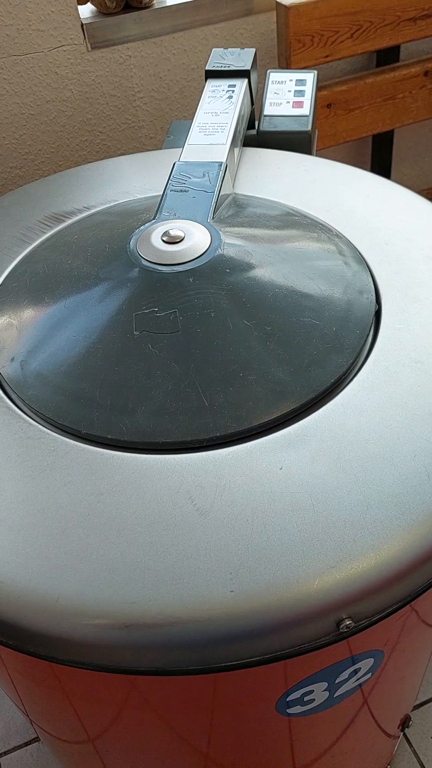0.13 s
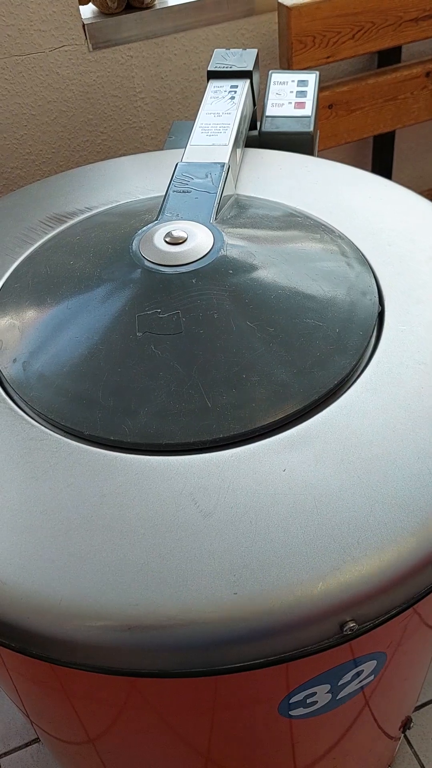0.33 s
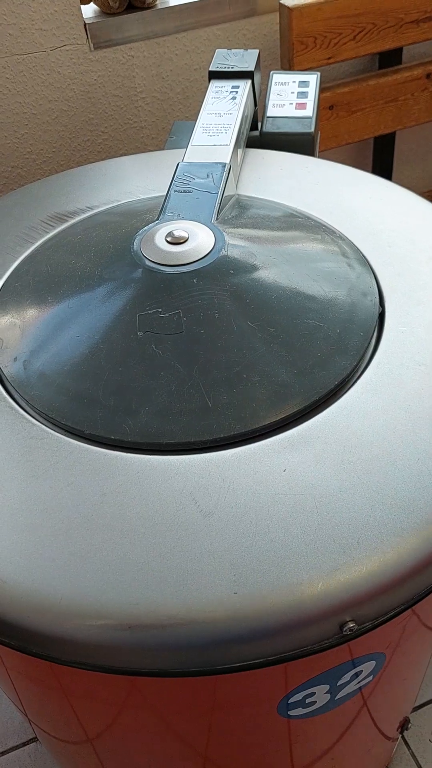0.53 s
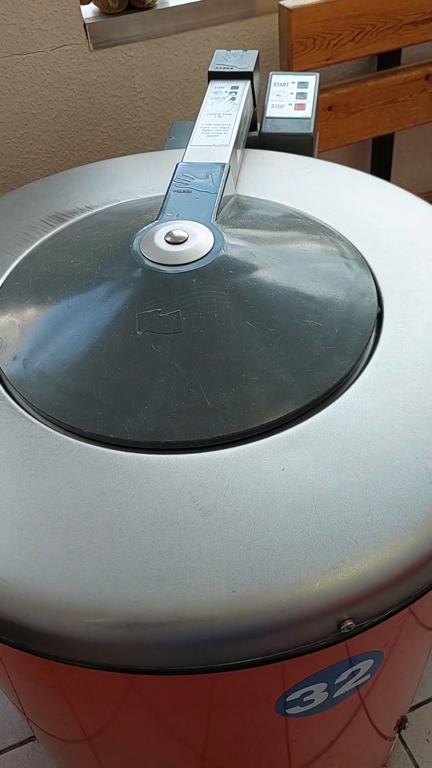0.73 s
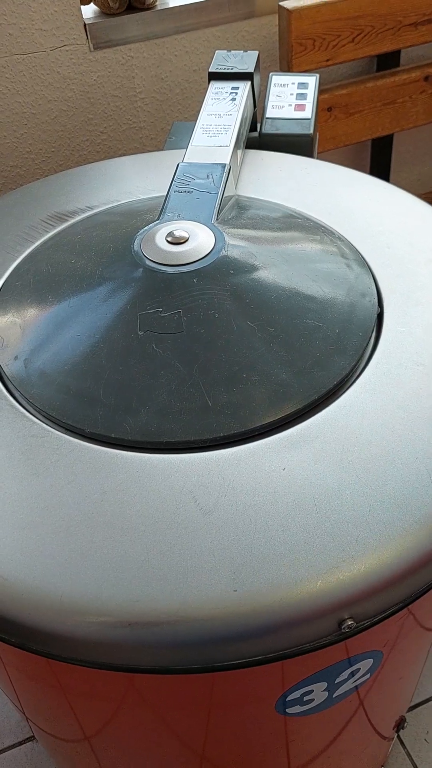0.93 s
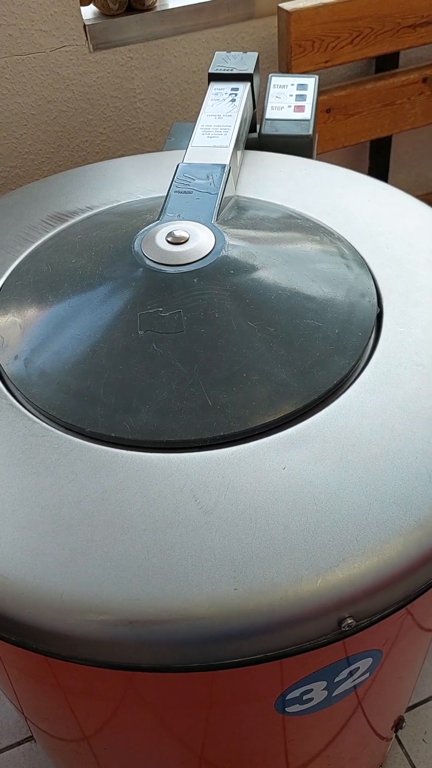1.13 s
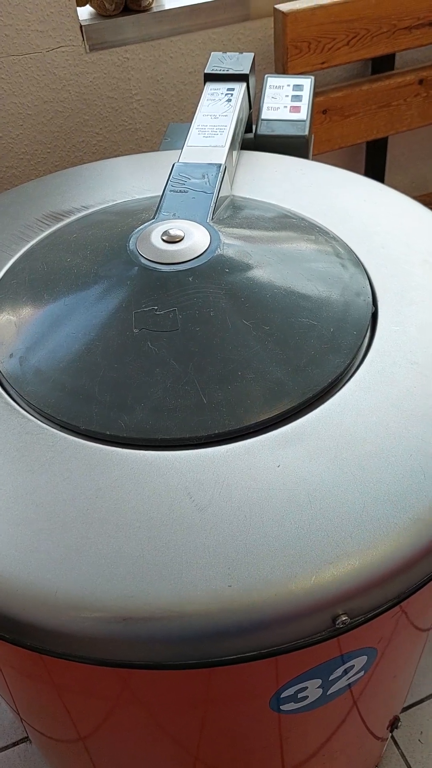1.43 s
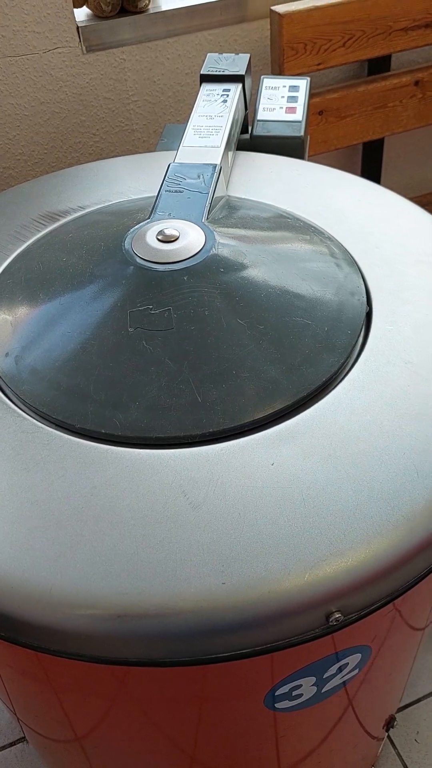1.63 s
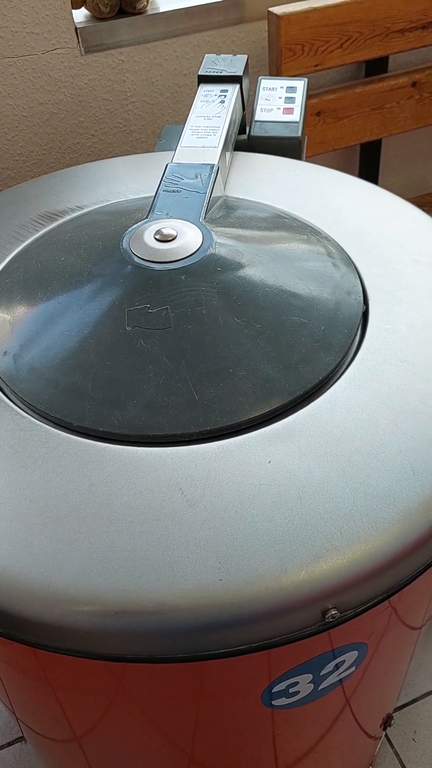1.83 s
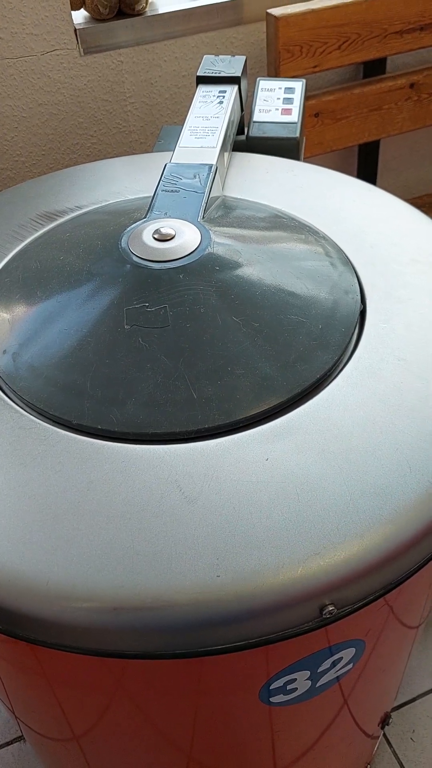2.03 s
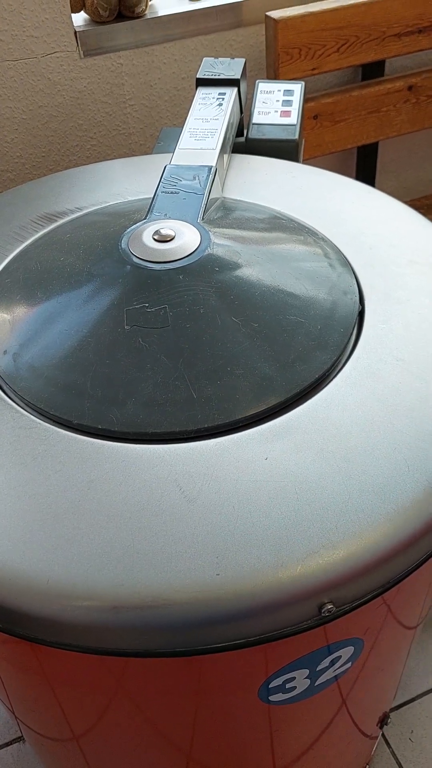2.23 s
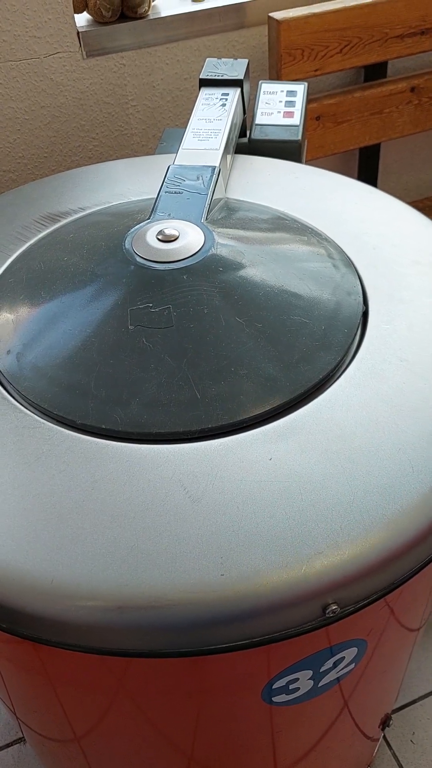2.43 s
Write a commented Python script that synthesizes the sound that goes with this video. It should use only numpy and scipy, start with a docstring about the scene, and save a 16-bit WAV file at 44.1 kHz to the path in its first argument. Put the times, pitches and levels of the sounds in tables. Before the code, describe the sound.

A spin dryer spins at constant full speed for about 2.6 seconds, heard close above the lid in a hard room. Its low-mid hum throbs roughly 24 times a second, clearest around 0.5 to 1.3 seconds, then smoother, with a stronger droning tone near 1.5 to 1.8. Soft low thuds bump during the first second. Bearing whir and airy rush continue, growing slightly; no start or stop.

```python
"""A spin dryer at full speed in a hard-walled room, heard from just above its lid.
Its unbalanced drum shakes the steel shell once a turn: near-aligned harmonics make a throbbing hum,
whose partials swell and fade as hand-held microphones drift through the standing waves.
Around it are a motor tone (sine), bearing whir (noise bands with tonal cores), rushing air
(coloured stereo noise) and soft tub thuds (short low cosines)."""
import sys
import numpy as np
from scipy import signal
from scipy.fft import rfft, irfft
from scipy.io import wavfile

SR = 44100
rng = np.random.default_rng(int(sys.argv[2]) if len(sys.argv) > 2 else 0)


def transcribe(signal):
    """Save signal, clipped to [-1, 1], as a 16-bit WAV file at the path in sys.argv[1]."""
    frames = np.atleast_2d(signal).T
    limited = np.clip(frames, -1, 1)
    pcm = np.round(limited * 32767).astype(np.int16)
    wavfile.write(sys.argv[1], SR, pcm)


N = 113337

LEFT_LAG_S = .00018  # sound reaches the left microphone later
WOBBLE_HZ = 2.996  # top rate of the speed wobble


def amp(db):
    """Decibels to gain."""
    return 10 ** (np.asarray(db) / 20)


def evened(x):
    """Scales to rms 1."""
    return x / np.sqrt(np.mean(abs(x) ** 2) + 1e-20)


def clock():
    """Time of each sample in seconds."""
    return np.arange(N) / SR


def lagged_clock():
    """Source time at each microphone (left, right) in seconds."""
    return clock() - np.array([[LEFT_LAG_S], [0]])


def curve(points):
    """Joins (s, value) points by straight lines."""
    return np.interp(clock(), *np.transpose(points))


def panned(x, pan_db):
    """Places a sound by its left-right level difference."""
    return x * amp([[pan_db / 2], [-pan_db / 2]])


def wander(top_hz, count=12):
    """Slow random motion of rms 1: sines from top_hz / 10 to top_hz in random phase."""
    coarse_s = np.linspace(0, N / SR, num=600)
    rates_hz = np.geomspace(top_hz / 10, top_hz, count)[:, None]
    waves = np.sin(2 * np.pi * (rates_hz * coarse_s + rng.random((count, 1)))).sum(0)
    return np.interp(clock(), coarse_s, evened(waves - waves.mean()))


def noise_bins():
    """Spectrum of white noise of rms 1, one per channel."""
    return rfft(rng.standard_normal((2, N)))


def hum():
    """Harmonics of the drum's rotation, roughly in step so that they throb once a turn."""
    turn_hz, wobble_turns = 23.79, .0041
    push_s = .022  # moment in each turn when the drum pushes hardest
    ring_order = 15  # partial at which the shell rings most strongly
    smear_rad = .05  # per order squared: the shell passes low partials later than high ones
    drift_rad, drift_db, drift_hz = .22, .8, 1.3  # room shifts of each partial
    rise_db, rise_s = -8, .45  # tabled harmonics start weak and swell in
    # random phase spread, a blurred throb that tightens to a crisp one, then blurs again:
    # time_s, spread_rad
    scatter = [(.15, 1.5), (.45, .7), (.8, .45), (1.15, .45), (1.4, 1.2), (2.57, 1.4)]
    # later arrival of the throb as the microphones drift: time_s, lag_s
    push_lag = [(.85, 0), (1.3, .004), (1.8, .004), (2.1, 0)]
    # partials with their own swells: time_s, level_db (before mix gain)
    ninth = [(0.05, -37), (.12, -42), (.21, -40), (.26, -47), (0.7, -46), (1.1, -35), (1.9, -35),
             (2.55, -41)]
    fourteenth = [(0, -50), (.2, -41), (.3, -42), (.5, -35.5), (.75, -42), (1.1, -38.5), (1.5, -46),
                  (2, -52)]
    fifteenth = [(0, -50), (0.15, -44), (0.32, -44), (0.42, -34), (0.62, -36), (0.8, -39), (1.02, -49),
                 (1.21, -38), (1.28, -33), (1.52, -29.5), (1.75, -30), (2.0, -35), (2.12, -33), (2.33, -35),
                 (2.57, -43)]
    # partials passing through standing waves:
    # order, crest_level_db (before mix gain), pan_db (left-right), crest_s, crest_period_s, dip_depth_db
    harmonics = [(2, -53, -2, 1.5, 1.3, 4), (3, -56, -3, .3, 2.7, 4), (4, -48, -4, 1.3, 1.7, 4),
                 (5, -48, 0, 1.9, 1.0, 4), (6, -47, 0, 1.65, 2.0, 12), (7, -54, 1, 1.05, 1.9, 12),
                 (8, -44.5, -1, 1.75, 3.2, 8), (10, -41, -4, 1.25, 2.1, 22), (11, -39, -6, .8, 2.1, 18),
                 (13, -38, -2, 1.1, 2.2, 22), (16, -45, -4, 1.55, 3.0, 12), (17, -44, -1, .95, 1.0, 12),
                 (18, -46, 0, 1.2, 3.0, 22), (19, -38.5, -2, 1.0, 1.1, 11), (20, -53, 0, .75, 2.5, 12),
                 (25, -47.5, -7, .9, 2.6, 22), (26, -54, -3, 1.15, 1.0, 4)]

    t = clock()
    turns = turn_hz * (lagged_clock() - push_s) + wobble_turns * wander(WOBBLE_HZ)

    def partial(level_db, pan_db, order):
        """One harmonic, its phase shifted by scatter, drift, shell smear and throb lag."""
        from_ring = order - ring_order
        shift_rad = curve(scatter) * rng.standard_normal() * min(abs(from_ring), 1)  # none at the ring
        shift_rad = shift_rad + drift_rad * wander(drift_hz)
        shift_rad += smear_rad * from_ring ** 2
        shift_rad -= 2 * np.pi * from_ring * turn_hz * curve(push_lag)
        wave = np.sqrt(2) * np.cos(2 * np.pi * order * turns + shift_rad)
        return panned(amp(level_db) * wave, pan_db)

    out = partial(curve(ninth), pan_db=-5.5, order=9)
    out += partial(curve(fourteenth), pan_db=-8, order=14)
    out += partial(curve(fifteenth), pan_db=-1, order=15)
    fade_in_db = rise_db * np.maximum(1 - t / rise_s, 0)
    for order, crest_db, pan_db, crest_s, period_s, depth_db in harmonics:
        angle = np.pi * (t - crest_s) / period_s
        standing_wave = np.hypot(np.cos(angle), amp(-depth_db) * np.sin(angle))
        swell_db = 20 * np.log10(standing_wave) + drift_db * wander(drift_hz)
        out += partial(crest_db + swell_db + fade_in_db, pan_db, order)
    return out


def motor():
    """The motor's own tone, a sine beating slowly against the drum's fourteenth partial."""
    motor_hz = 331.7
    # time_s, level_db
    motor_level = [(0, -56), (1.1, -52), (1.5, -44), (2.2, -41.5), (2.57, -43)]
    turns = motor_hz * lagged_clock() + rng.random()
    return panned(amp(curve(motor_level)) * np.sqrt(2) * np.cos(2 * np.pi * turns), pan_db=-5)


def bearings():
    """Bearings excite shell resonances: bands of noise, the narrow ones with a wavering tonal core."""
    waver_db, waver_hz = 3.5, 8
    core_share, core_width_hz = .85, 19.7  # narrower tones hold more core
    # bearing tones and shell resonances: tone_hz, width_hz, left_db, right_db (before mix gain)
    tones = [(570, 12, -58, -52), (595, 30, -58, -52), (616, 28, -54, -53), (848, 30, -55, -50),
             (868, 20, -60, -55), (978, 12, -62, -56), (998, 9, -58, -52), (1018, 12, -60, -55),
             (1107, 9, -51, -52), (1197, 10, -64, -56), (1434, 14, -51, -44.5), (1460, 110, -47, -44.5),
             (1481, 16, -53, -48), (1514, 12, -51, -50), (1634, 11, -54, -50), (1726, 35, -58, -49),
             (1915, 50, -58, -55), (2174, 21, -53, -61), (2436, 81, -61, -59), (2803, 26, -62, -62),
             (2836, 24, -65, -62), (3029, 14, -61, -56.5), (4057, 83, -73, -61), (4732, 349, -61, -54),
             (4951, 368, -62, -52)]
    hz = np.fft.rfftfreq(N, 1 / SR)
    out = np.zeros((2, N))
    for tone_hz, width_hz, left_db, right_db in tones:
        resonance = 1 / (1 + (2 * (hz - tone_hz) / width_hz) ** 2)
        fuzz = evened(irfft(noise_bins() * resonance, N))
        turns = tone_hz * lagged_clock() + rng.random()
        tone = np.sin(2 * np.pi * turns + wander(WOBBLE_HZ))
        core = evened(amp(waver_db * wander(waver_hz)) * tone)
        clean = np.clip(core_share * np.exp(-(width_hz / core_width_hz) ** 2), 0, 1)
        out += amp([[left_db], [right_db]]) * (np.sqrt(clean) * core + np.sqrt(1 - clean) * fuzz)
    return out


def rush():
    """Air rush and rolling noise, coloured by the shell, with fixed ripples and a slight flutter."""
    ripple_db, ripple_width_hz = 1.6, 22  # close-packed resonances of shell and room
    flutter_db, flutter_hz = .42, 14
    # noise colour: freq_hz, left_db_per_hz, right_db_per_hz (before mix gain)
    colour = [(20, -87.0, -86.0), (35, -82.5, -80.5), (52, -64.0, -62.0), (62, -64.5, -62.0),
              (78, -69.5, -66.5), (135, -59.5, -60.5), (175, -71.5, -68.5), (240, -67.5, -64.0),
              (285, -73.0, -70.5), (350, -67.5, -64.0), (470, -70.5, -66.5), (540, -84.5, -76.0),
              (620, -75.0, -67.5), (720, -74.5, -70.5), (920, -78.5, -74.0), (1080, -71.5, -68.0),
              (1250, -76.5, -76.0), (1370, -71.5, -69.5), (1580, -74.0, -73.0), (1950, -72.5, -69.5),
              (2110, -79.0, -77.5), (2350, -79.5, -78.0), (2700, -80.5, -80.5), (3200, -86.0, -82.5),
              (3900, -82.0, -78.0), (4900, -91.0, -81.5), (5350, -86.0, -81.5), (5900, -88.5, -90.5),
              (7000, -93.5, -102.5), (7600, -92.0, -104.5), (8400, -97.0, -108.5), (9500, -100.5, -101.0),
              (12200, -101.0, -98.0), (14200, -105.0, -106.0), (15500, -113.0, -114.0)]
    # likeness of the two channels: freq_hz, coherence (0-1)
    likeness = [(60, 0.95), (200, 0.96), (380, 0.79), (700, 0.48), (1300, 0.11), (4000, 0.026),
                (15000, 0.038)]
    hz = np.fft.rfftfreq(N, 1 / SR)

    def read(points):
        """Table columns interpolated over log frequency."""
        freq_hz, *columns = np.transpose(points)
        return np.array([np.interp(np.log(hz + 1), np.log(freq_hz), c) for c in columns])

    same = np.clip(read(likeness)[0], -1, 1)
    shared, separate = noise_bins()
    left = shared * np.exp(-2j * np.pi * hz * LEFT_LAG_S)
    right = same * shared + np.sqrt(1 - same ** 2) * separate
    knots = rng.standard_normal(size=(2, 4000))
    ripple = np.array([np.interp(hz / ripple_width_hz, np.arange(len(k)), k) for k in knots])
    # ripple is weaker where the channels are alike
    colour_db = read(colour) + ripple_db * (1 - same) * evened(ripple)
    noise = irfft(np.array([left, right]) * amp(colour_db), N) * np.sqrt(SR / 2)  # to level per Hz
    return noise * amp(flutter_db * wander(flutter_hz))


def thuds():
    """The tub's low rumble bunches into soft bumps: cosines under Gaussian envelopes."""
    width_s = .022  # peak to 1/e
    # peak_s, peak_db, pitch_hz
    bumps = [(0.207, -36, 62.6), (.359, -38, 54), (.589, -41, 51), (.799, -36, 57), (1.089, -44, 68)]
    t = clock()
    out = np.zeros(N)
    for peak_s, peak_db, pitch_hz in bumps:
        envelope = amp(peak_db) * np.exp(-((t - peak_s) / width_s) ** 2)
        out += envelope * np.cos(2 * np.pi * pitch_hz * (t - peak_s))
    return out


def scene():
    """Mixes the whole machine; the whir grows a little from start to end."""
    whir_rise_db = 2.5
    whir_db = .9 + whir_rise_db * (clock() / clock()[-1] - .5)
    return amp(-.12) * hum() + motor() + amp(whir_db) * bearings() + amp(.7) * rush() + thuds()


def record(dry):
    """The recorder's band limit, with a brief fade at either end."""
    edge_hz, fade_s = 15650, .0006
    t = clock()
    fade = np.clip(np.minimum(t, t[-1] - t) / fade_s, 0, 1)
    low_pass = signal.firwin(511, edge_hz, window=("kaiser", 9), fs=SR)
    return fade * signal.oaconvolve(dry, low_pass[None], "same")


dry = scene()
out = record(dry)
transcribe(out)
```